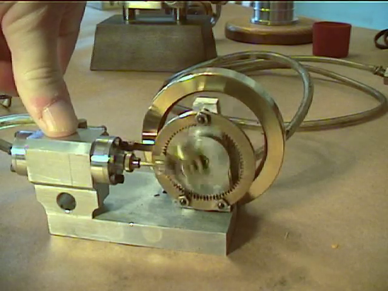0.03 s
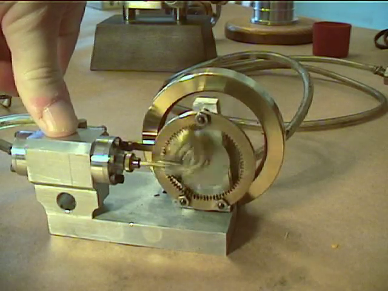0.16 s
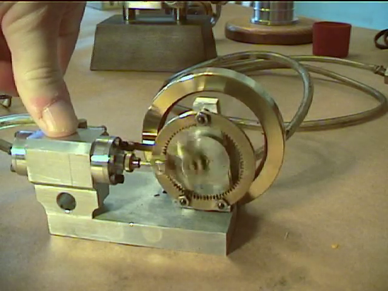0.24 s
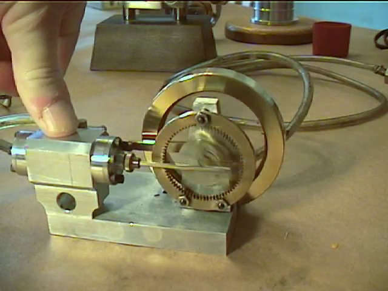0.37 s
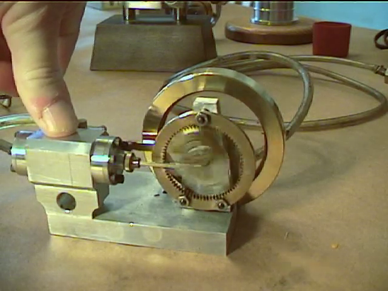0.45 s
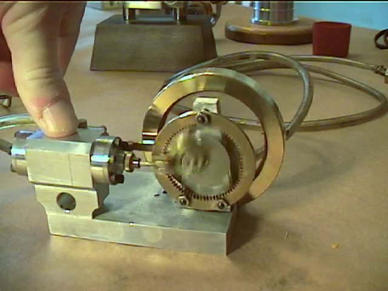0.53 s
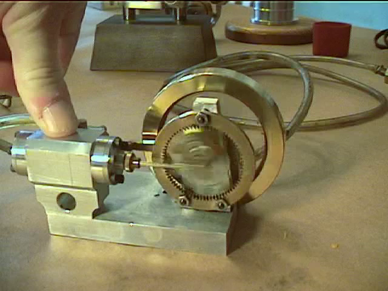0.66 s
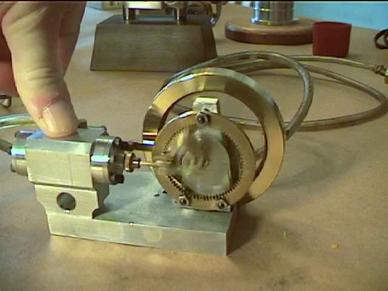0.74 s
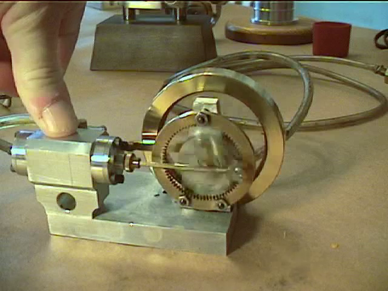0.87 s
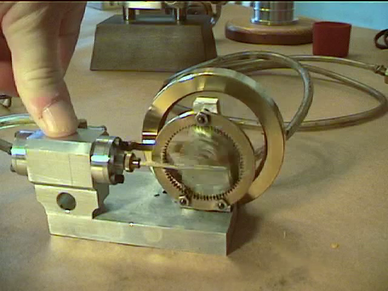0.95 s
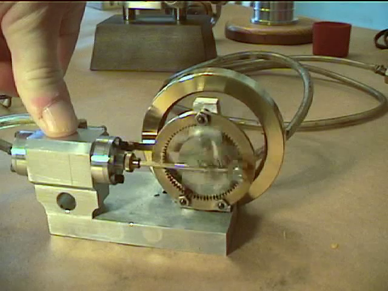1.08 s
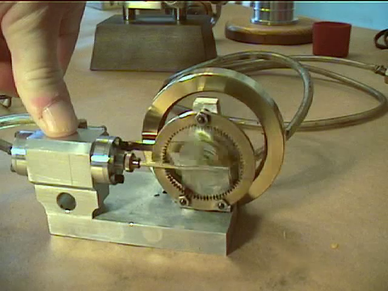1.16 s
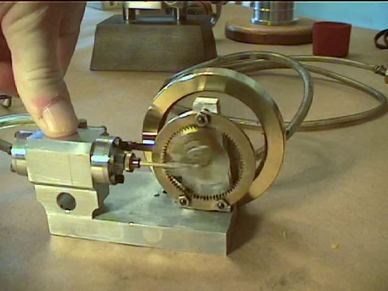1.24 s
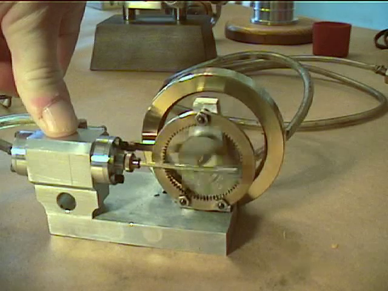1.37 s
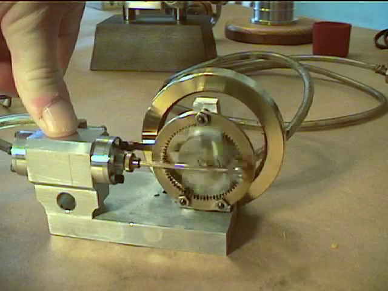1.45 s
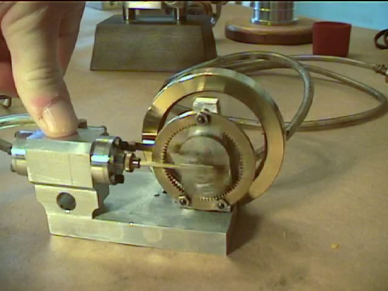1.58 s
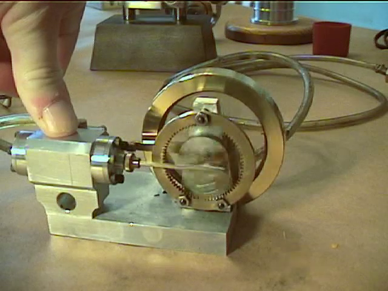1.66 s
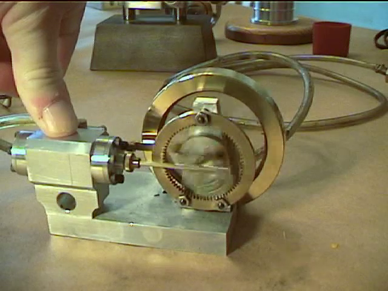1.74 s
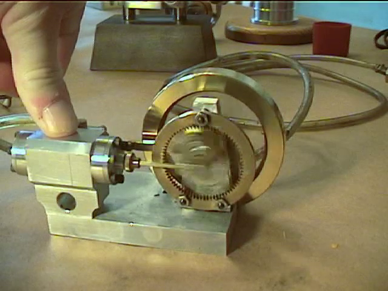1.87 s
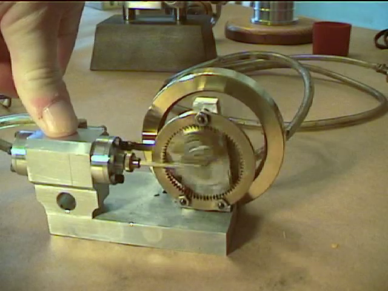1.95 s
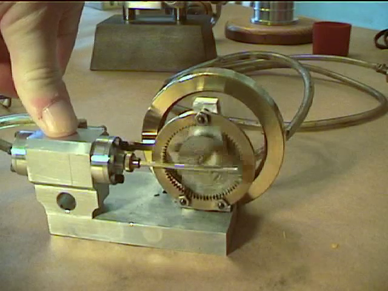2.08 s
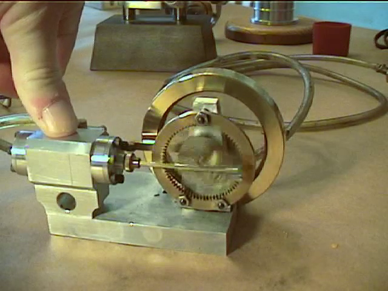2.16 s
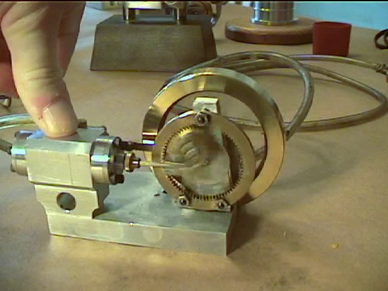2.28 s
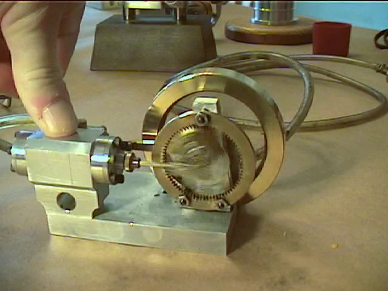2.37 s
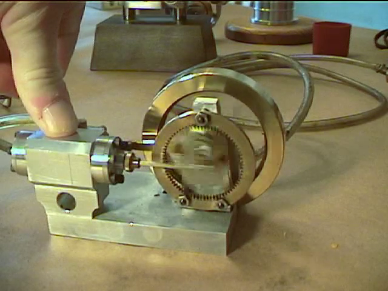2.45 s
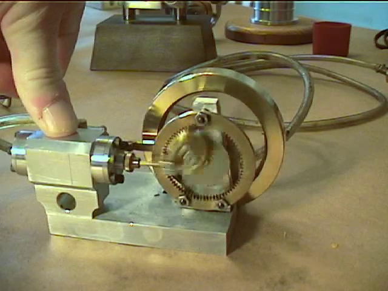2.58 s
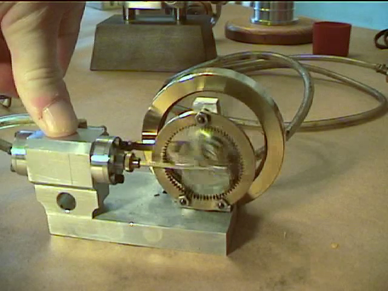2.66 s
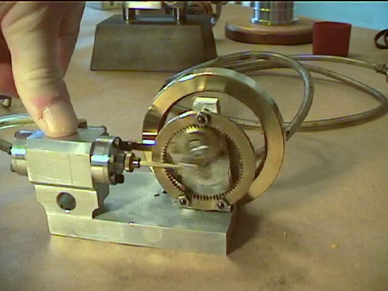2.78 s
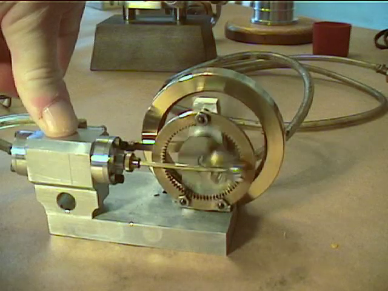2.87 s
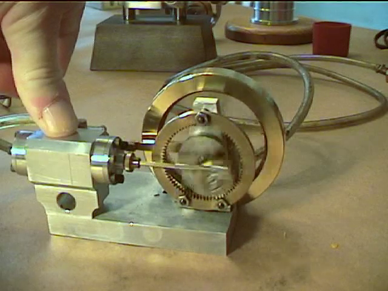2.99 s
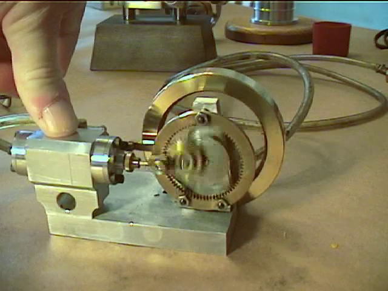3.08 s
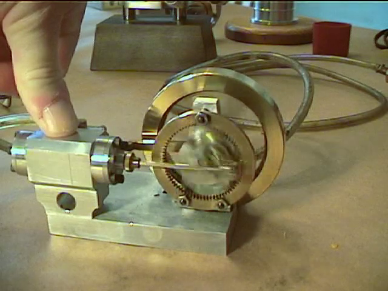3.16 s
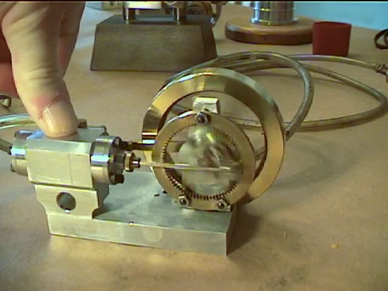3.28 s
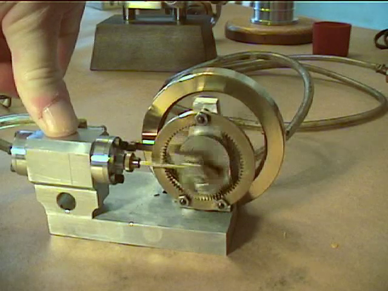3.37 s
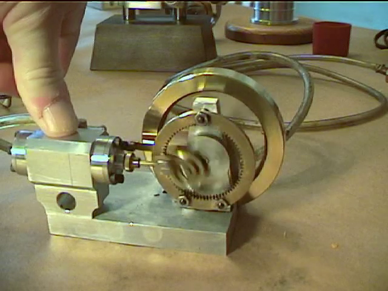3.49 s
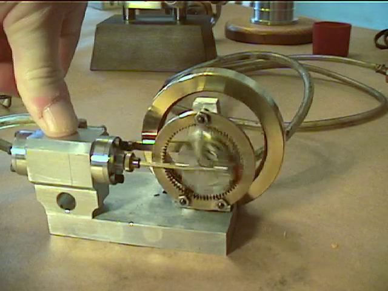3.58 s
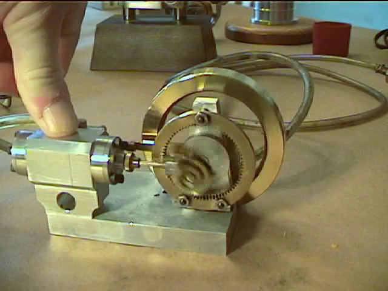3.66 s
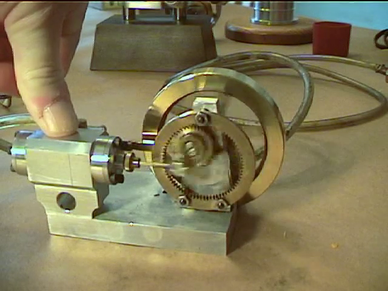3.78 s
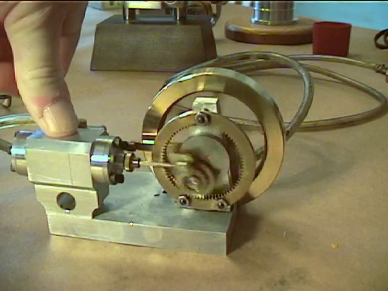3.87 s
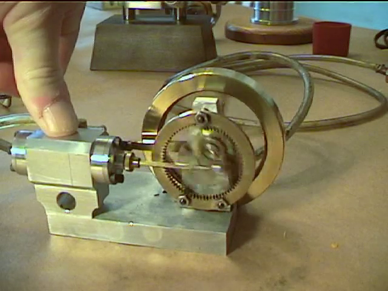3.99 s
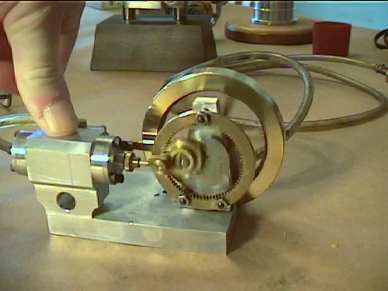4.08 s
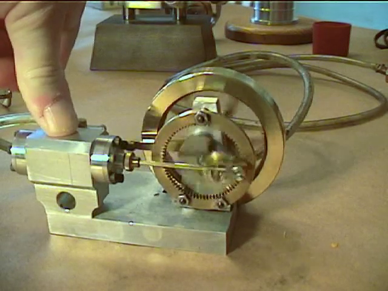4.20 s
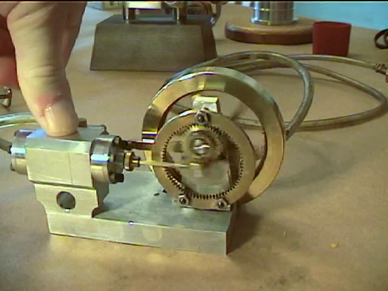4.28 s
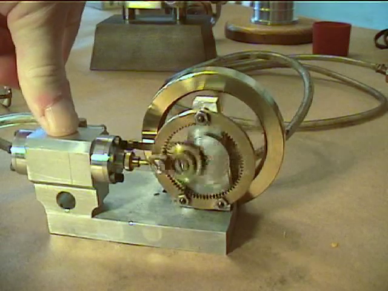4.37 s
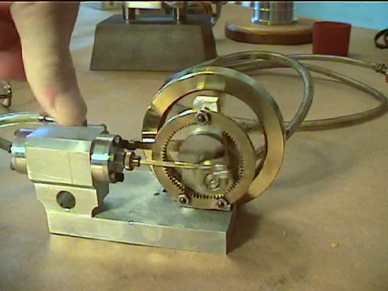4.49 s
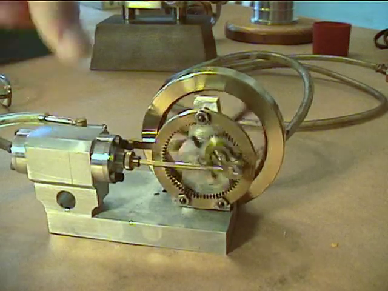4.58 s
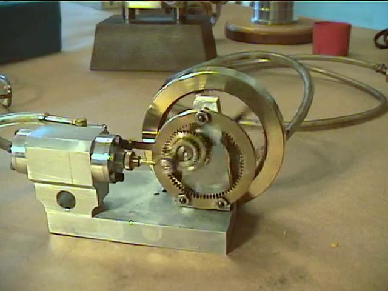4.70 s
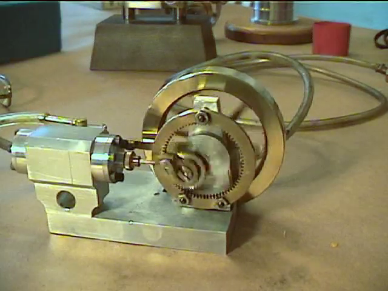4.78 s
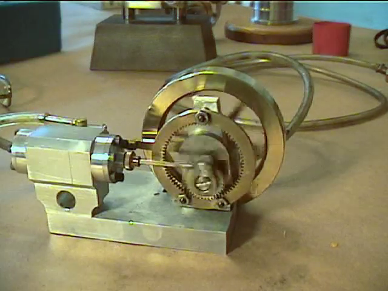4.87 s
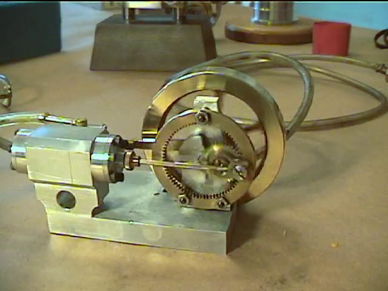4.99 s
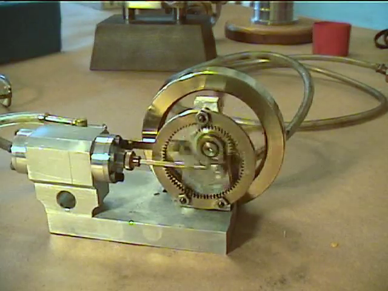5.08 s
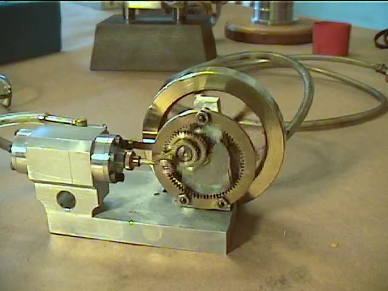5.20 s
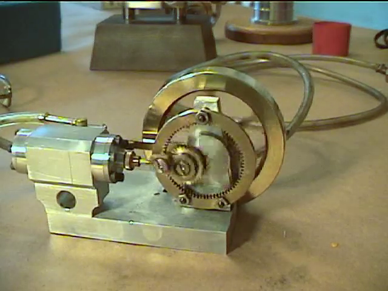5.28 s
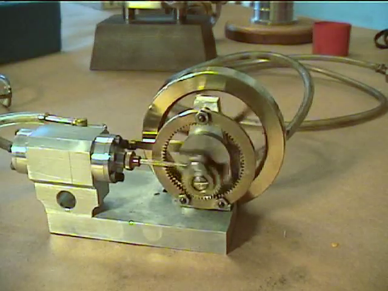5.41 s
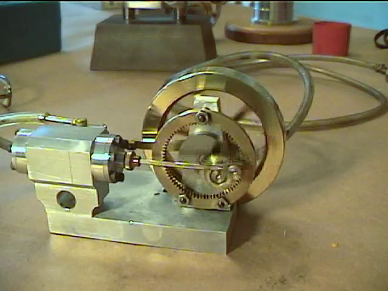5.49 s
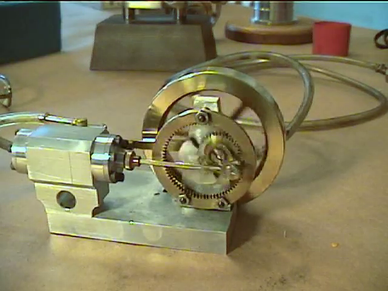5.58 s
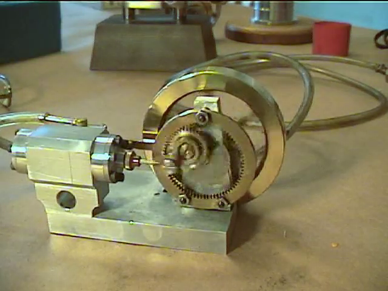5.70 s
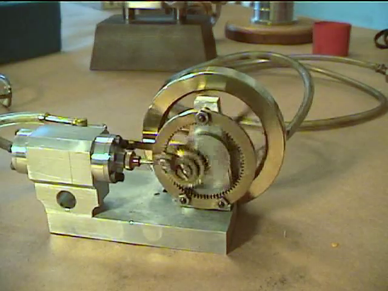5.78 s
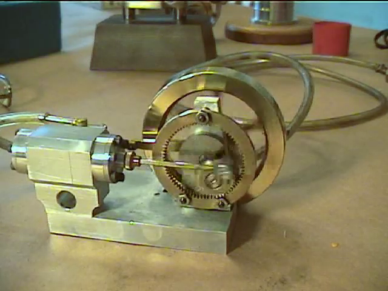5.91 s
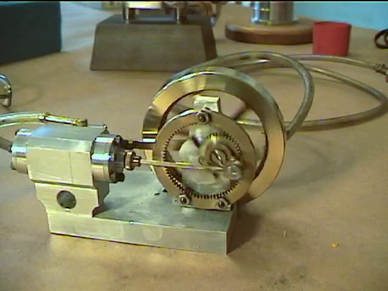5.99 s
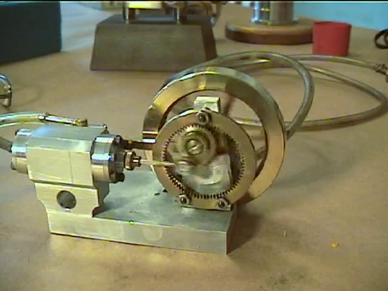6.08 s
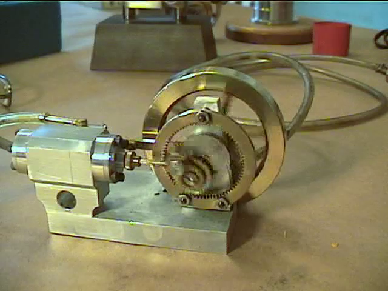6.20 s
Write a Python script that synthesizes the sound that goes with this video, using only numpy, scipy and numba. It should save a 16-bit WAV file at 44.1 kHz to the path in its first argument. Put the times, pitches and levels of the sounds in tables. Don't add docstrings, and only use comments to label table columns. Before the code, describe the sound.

From 0 to about 1.5 s a small engine runs fast and steadily close to the microphone: harsh, sputtering air hiss pulses nearly 28 times a second, blurred into a flutter, with a gear whine near 1 kHz, quick metallic ticks and a few dull low jolts. From 1.6 s it gradually slows; around 2.5-2.9 s speed and hiss drop sharply, the whine sinks and fades, and separate chuffs, loose gear rattle and ticks stand out. By 3.8 s the hiss is much weaker. A tiny dry snap with a bounce falls at 4.0 s. From 4.4 s only slow soft puffs and irregular bright clicks remain, nearly vanishing at 5.1 s, while a throbbing low compressor hum, about 290 Hz, and room noise come forward. A very faint thin whistle lasts from 4.9 to 5.6 s. Light hiss returns slightly from 5.7 s to the end, with slow ticks.

```python
import sys
import numpy as np
from scipy import signal
from scipy.fft import rfft, irfft
from scipy.io import wavfile
from scipy.ndimage import uniform_filter1d
from numba import njit

SR = 44100
rng = np.random.default_rng(int(sys.argv[2]) if len(sys.argv) > 2 else 0)


def digitize_waveform(pressure):
    field = np.atleast_2d(pressure).T
    bounded = np.clip(field, -1, 1)
    quanta = np.round(bounded * 32767).astype(np.int16)
    wavfile.write(sys.argv[1], SR, quanta)


def attenuation_scalar(level_db):
    decades = np.asarray(level_db, float) / 20
    return 10 ** decades


N = 275392
T = np.arange(N) / SR

# t/s, speed/(turns/s)
CRANK_SPEED = [(0, 13.788), (.42, 13.808), (1.36, 13.694), (1.69, 13.042), (1.87, 12.251), (2.27, 12.119),
               (2.47, 11.289), (2.82, 8.328), (2.92, 7.867), (3.36, 7.412), (3.44, 7.748), (3.73, 6.11),
               (3.81, 5.39), (4.25, 3.477), (4.44, 2.976), (5.07, 2.186), (6.3, 2.004)]
START_TURNS = -.5702
# t/s, level/dB
SUPPLY = [(0, -34), (.9, -34), (1.4, -34), (1.7, -36), (2.4, -35.5), (2.6, -39), (2.92, -41), (3.2, -40),
          (3.36, -39.5), (3.6, -41), (3.9, -48.5), (4.4, -51.5), (4.6, -56), (4.85, -58), (5.1, -67),
          (5.7, -55.5), (5.95, -55.5), (6.24, -53)]
# speed/(turns/s), thin leak/dB, rattle/dB, whine/dB, thump/dB
SPEED_LAW = [(2.2, -1, -32, -90, -29), (3, -7, -21, -90, -29), (3.8, -3.5, -9, -80, -25),
             (5.5, -7.5, -8.5, -54, -34), (7.7, -6.3, -11, -18.5, -32), (10.5, -5.5, -10.5, -12, -41),
             (12.2, -3.5, -9, -11, -38), (13.1, -3, -11, -3.5, -36), (13.75, -3, -11.5, -6.5, -42)]

# phase/turns, width/turns, level/dB against the open valve
VALVE_EVENTS = [
    (.31, 0.029, -6),
    (.4, 0.049, -4),
    (.76, 0.063, -2.5),
    (.86, 0.073, -3),
    (.99, 0.044, 1.5),
]
VALVE_OPEN_DB, VALVE_LEAD_TURNS = 1.0, 0.027
# f/Hz, width/Hz, level/dB
PORT_MODES = [(2400, 610, -4), (2960, 240, -4.5), (3870, 290, -0.5), (4220, 910, 3), (5020, 390, -1),
              (5360, 620, -4.5)]
# f/Hz, level/(dB per Hz)
JET_SPECTRUM = [(710, 0), (1200, -9.5), (1540, -2.5), (3550, -2.5), (3890, -7), (5120, -3.5), (6030, -4.5),
                (9770, -9.5), (10600, -15.5), (13800, -69), (22000, -120)]

# phase/turns, rattle/dB, whine/dB
GEAR_CONTACT = [(0, -3, 5.5), (.06, 5.5, 1.5), (.14, 4, -5.5), (.22, -2, -16), (.38, -11, -19),
                (.5, -6, -8.5), (.72, -3, -13), (.82, 5, -6), (.93, 2, 3.5)]
TEETH = 72
WEAR_ORDERS, WEAR_DEPTH = (29, 31), .45
# f/Hz, width/Hz, level/dB
BASE_MODES = [(560, 150, -7), (814, 82, -4.5), (941.5, 41, -1), (1140, 67, 2), (1391, 51, -1),
              (1636, 33, -8.5), (2500, 230, -31)]
# f/Hz, width/Hz, level/dB
BENCH_MODES = [(182, 187, 6), (355, 20, 2.5), (432, 9.4, -4), (493.4, 20, -0.5), (610, 85, 4.5)]

# phase/turns, thump/dB, knock/dB
ROD_REVERSALS = [
    (0.226, 0, -65),
    (0.439, -5, -64),
    (0.619, -14, -72),
    (0.858, -7, -97),
]

PUMP_HZ, PUMP_START_S, HUM_ORDER = 14.129, .0275, 20.5
HUM_DB, BLOWN_DB, PUMP_DB = -55.5, -62, -70.5
# phase/strokes, level/dB
PUMP_STROKE = [(0, -16), (.08, -9), (.17, -4), (.28, -3), (.38, -.5), (.52, -5), (.66, 0), (.8, -2.5),
               (.9, -9)]
# f/Hz, width/Hz, level/dB
CASING_MODES = [(163, 28, -9.5), (420, 17, -29), (533, 18, -14), (605.4, 9.5, -11.5), (836, 21, -6.5),
                (997, 7.9, -10.5)]
# f/Hz, width/Hz, level/dB
GRILLE_MODES = [(2710, 70, -18), (6600, 380, 3), (8100, 240, 10.5), (8840, 200, -6)]
WHISTLE_FROM_S, WHISTLE_TO_S, WHISTLE_EDGE_S, WHISTLE_DB = 4.86, 5.62, .04, -71
# f/Hz, level/(dB per Hz)
ROOM_SPECTRUM = [(20, -21), (110, -12.5), (200, -5.5), (290, 5), (400, -3.5), (600, 0.5), (720, -9),
                 (1010, -3), (1150, -10.5), (1500, -11), (2300, -10.5), (2630, -5), (3300, -7), (6700, -4),
                 (7300, -10), (10800, -19)]
ROOM_DB = -52

# t/s, peak level/dB
BASE_JOLTS = [(0.048, -72), (0.327, -61), (0.397, -57), (0.475, -61), (0.645, -66), (0.689, -57),
              (0.847, -61), (1.054, -67), (1.42, -57), (1.492, -64), (1.801, -66), (1.889, -64),
              (1.963, -60), (2.049, -64), (2.209, -61), (2.293, -64), (2.456, -64), (2.907, -63),
              (3.014, -62), (3.137, -72), (3.329, -68), (3.379, -70), (3.973, -63), (4.199, -71),
              (4.865, -63)]
JOLT_HZ, JOLT_WIDTH_HZ, JOLT_DB, JOLT_LAG_S = 36., 110., 1, .014

# phase/turns, lead when slack/turns, peak over hiss/dB, rise when slack/dB, f/Hz
DEAD_CENTRES = [
    (.468, .035, 15, 1.5, 4370),
    (.96, .17, 10, 8.5, 4780),
]
ODD_TURN_DB, TICK_SCATTER_DB, RING_SCATTER = -2.5, 1.5, 0.09
PLAY_FROM_S, PLAY_TO_S = .05, 3.42
# t/s, peak level/dB, f/Hz
HARD_TICKS = [(.3636, -17, 5000), (.4368, -19, 4350), (1.1628, -15, 4340), (1.2703, -18, 3870),
              (1.6811, -14, 4000), (2.0039, -18, 4300), (2.0837, -18, 4870), (2.168, -18, 4430),
              (2.9088, -20.5, 5230), (3.3772, -27, 4200), (4.5844, -32, 4860), (4.9215, -35, 5900)]
# t/s, high peak level/dB, high f/Hz, low peak level/dB, low f/Hz
SLOW_TICKS = [(3.461, -24.5, 3940, -47, 3180), (3.5114, -29, 5090, -44, 2780),
              (3.7785, -32, 3790, -45, 2940), (3.8427, -38, 3890, -47, 3490), (3.958, -34, 4100, -51, 3490),
              (3.998, -33, 4100, -41, 1940), (4.21, -36, 7650, -43.5, 2400),
              (4.2768, -42, 3800, -42.5, 2790), (4.3388, -36.5, 3710, -57, 2870),
              (4.4115, -39, 5360, -44, 2960), (4.506, -36, 4200, -46, 3180),
              (4.5244, -37.5, 5410, -55, 3100), (4.5685, -38, 3910, -51, 3050),
              (4.7585, -39, 5470, -47, 2690), (4.8894, -37, 4240, -42, 3220), (4.982, -35, 4870, -47, 3420),
              (5.1267, -50, 3810, -44, 2970), (5.31, -34, 5230, -45, 2800), (5.4073, -35, 4170, -46, 3120),
              (5.67, -45, 5660, -41, 2840), (5.8194, -40, 5760, -44, 2670), (5.8953, -34, 4190, -46, 2360),
              (5.995, -40, 5400, -48, 1630), (6.0885, -38, 4020, -48, 2570)]
# f/Hz, width/Hz, level/dB
JOINT_MODES = [(1430, 570, 12), (2290, 270, -3.5), (2750, 180, -6.5), (3130, 84, -2.5), (4100, 430, 6.5),
               (4530, 210, 0.5), (4970, 300, 6), (5640, 1900, 5.5), (6620, 400, 4.5), (7650, 500, 7.5)]
# t/s, peak level/dB
JOINT_SNAPS = [
    (3.9984, -22),
    (4.0085, -32),
]
SNAP_LENGTH_S = .00004

KNEE_DB, DUCKING, FULL_GAIN_DB = -38, 1.4, 0.9
RECOVER_FROM_S, RECOVER_DB_PER_S = 5.03, 1.2
TOP_HZ = 10750


def level(x, db):
    return x * attenuation_scalar(db) / np.sqrt(np.mean(x ** 2))


@njit
def svf(x, hz, width):
    y, band, low = np.empty(len(x)), 0., 0.
    g, k = np.tan(np.pi * hz / SR), width / hz
    for i in range(len(x)):
        v = (band + g * (x[i] - low)) / (1 + g * (g + k))
        band = 2 * v - band
        low = low + 2 * g * v
        y[i] = k * v
    return y


def ring(x, modes):
    out = 0
    for k, (hz, width, db) in enumerate(modes):
        out = out + (-1) ** k * attenuation_scalar(db) / width * svf(x + 1e-18, 1. * hz, 1. * width)
    return out


def coloured(spectrum):
    hz, db = np.transpose(spectrum)
    bins = np.maximum(np.arange(N // 2 + 1) * SR / N, 1)
    weight = attenuation_scalar(np.interp(np.log(bins), np.log(hz), db))
    return level(irfft(rfft(rng.standard_normal(N)) * weight, N), 0)


def walk(rate):
    k = int(SR / rate)
    held = np.repeat(rng.standard_normal(N // k + 1), k)
    return 1.35 * uniform_filter1d(uniform_filter1d(held, k), k)[:N]


def clicks(phase):
    step = np.floor(phase).astype(int)
    at = np.flatnonzero(np.diff(step)) + 1
    late = (phase[at] - step[at]) / (phase[at] - phase[at - 1])
    out = np.zeros(N)
    out[at - 1], out[at] = late, 1 - late
    return out, np.append(step[1:], step[-1])


def air(turns, slack, hiss_db, leak_db):
    valve_db = VALVE_OPEN_DB
    for phase, width, db in VALVE_EVENTS:
        away = (turns + VALVE_LEAD_TURNS * slack ** 2 - phase + .5) % 1 - .5
        valve_db = valve_db + db * np.exp(-(away / width) ** 2)
    valve_db = valve_db * (1 + .55 * slack)
    sputter = attenuation_scalar(1.2 * walk(900) + 0.32 * walk(120))
    drops = (rng.random(N) < 250 / SR) * attenuation_scalar(np.minimum(3.2 * rng.exponential(size=N), 14))
    jet = coloured(JET_SPECTRUM) * sputter + level(svf(drops, 6800.0, 5000.), -15)
    port = 0
    for hz, width, db in PORT_MODES:
        mode = svf(rng.standard_normal(N) * sputter, 1. * hz, 1. * width)
        port = port + level(mode * attenuation_scalar(1.3 * walk(60)), db)
    leak_cut = signal.butter(3, 6200, "high", fs=SR, output="sos")
    thin = signal.sosfilt(leak_cut, coloured(JET_SPECTRUM) * attenuation_scalar(1.35 * walk(300)))
    roar_cut = signal.butter(2, 1500, "high", fs=SR, output="sos")
    roar = signal.sosfilt(roar_cut, svf(jet, 3400.0, 8600.0))
    pressure = attenuation_scalar(0.99 * np.clip(hiss_db + 32.0, -8, 0))
    exhaust = level(port, -2.38) + level(roar, -3.0) * pressure
    return attenuation_scalar(hiss_db) * (attenuation_scalar(valve_db) * exhaust + attenuation_scalar(leak_db + .5 * valve_db) * level(thin, -0.89))


def gear(turns, slack, rattle_db, whine_db):
    phase, *columns = np.transpose(GEAR_CONTACT)
    slack_db, bearing_db = (np.interp(turns, phase, c, period=1) for c in columns)
    mesh = TEETH * (turns + 0.001 * np.sin(2 * np.pi * turns))
    whine = np.sin(2 * np.pi * mesh + 0.34 * walk(150)) * attenuation_scalar(bearing_db + whine_db + .8 * walk(30))
    pulses, tooth = clicks(mesh)
    waves = sum(np.cos(2 * np.pi * order * tooth / TEETH) for order in WEAR_ORDERS)
    worn = pulses * (rng.standard_normal(TEETH)[tooth % TEETH] + WEAR_DEPTH * waves)
    chatter = rng.standard_normal(N) * attenuation_scalar(slack_db + 2.5 * walk(160))
    rattle = level(ring(chatter, BASE_MODES), 0.71) + level(ring(worn * attenuation_scalar(slack_db), BASE_MODES), -5.0)
    rubbing = rng.standard_normal(N) * attenuation_scalar(0.32 * slack_db)
    rush = level(svf(rubbing, 1170.0, 520.0), -0.28) + level(ring(worn, BENCH_MODES), -14.5)
    drop = np.exp(-((turns % 1 - .48) / 0.049) ** 2) * slack ** 3 * rng.standard_normal(N)
    rattle = rattle + level(svf(svf(drop, 616.0, 100.0), 540.0, 170.0), -15.5)
    return whine + attenuation_scalar(rattle_db) * (slack * rattle + (1.15 - slack) * rush)


def rod(turns, rattle_db, thump_db):
    out = 0
    for phase, low_db, knock_db in ROD_REVERSALS:
        pulses, step = clicks(turns - phase)
        pulses = pulses * attenuation_scalar(3.1 * np.clip(rng.standard_normal(60), -2, 1)[step])
        thump = svf(svf(pulses, 38.0, 100.0), 38.0, 100.0)
        knock = ring(pulses * attenuation_scalar(rattle_db), BENCH_MODES)
        out = out + level(thump, low_db - 5.5) * attenuation_scalar(thump_db) + level(knock, knock_db)
    return out


def compressor():
    stroke = PUMP_HZ * (T - PUMP_START_S) + 1
    swing = (-1) ** np.floor(stroke) * attenuation_scalar(np.interp(stroke, *np.transpose(PUMP_STROKE), period=1))
    hum = uniform_filter1d(swing, size=200) * np.sin(2 * np.pi * HUM_ORDER * stroke)
    casing = ring(clicks(stroke)[0], CASING_MODES)
    blown = ring(rng.standard_normal(N), CASING_MODES + GRILLE_MODES)
    steady = level(hum, HUM_DB) + level(casing, PUMP_DB) + level(blown, BLOWN_DB)
    return (steady + whistle()) * attenuation_scalar(0.65 * walk(6.33))


def room_noise():
    return level(coloured(ROOM_SPECTRUM) * attenuation_scalar(1.06 * walk(25.26)), ROOM_DB)


def jolts():
    s, db = np.transpose(BASE_JOLTS)
    blows, one = np.zeros(N), np.zeros(N)
    blows[((s + JOLT_LAG_S) * SR).astype(int)] = attenuation_scalar(db + JOLT_DB)
    one[0] = 1
    thuds, single = (svf(svf(b + 1e-18, JOLT_HZ, JOLT_WIDTH_HZ), JOLT_HZ, JOLT_WIDTH_HZ)
                     for b in (blows, one))
    return thuds / np.max(np.abs(single))


def play(turns, slack, hiss_db):
    rows, n = [], np.arange(50)
    for phase, early, over_db, slack_db, hz in DEAD_CENTRES:
        s = np.interp(n + phase, turns + early * slack ** 2, T)
        at = (s * SR).astype(int)
        chance = np.clip(rng.standard_normal((len(n), 2)), -2, 2).T
        db = hiss_db[at] + over_db + slack_db * slack[at]
        db = db + ODD_TURN_DB * (n % 2) + TICK_SCATTER_DB * chance[0]
        blows = zip(s, db, hz * (1 + RING_SCATTER * chance[1]))
        rows += [row for row in blows if PLAY_FROM_S < row[0] < PLAY_TO_S]
    return rows


def ticks(table, cut_db, focus_db, tail_s):
    out, t = np.zeros(N + 900), np.arange(900) / SR
    for (s, db, pitch), grain in zip(table, rng.standard_normal((len(table), 900))):
        blow = (t == 0) + 0.13 * grain * np.exp(-t / tail_s)
        near = [(hz, width, mode_db + 20 * np.log10(width) / 2 - focus_db * abs(np.log2(hz / pitch)))
                for hz, width, mode_db in JOINT_MODES]
        tick = ring(blow, near)
        at = int(s * SR)
        out[at:at + 900] += attenuation_scalar(db + cut_db) * tick / np.max(np.abs(tick))
    return out[:N]


def snaps():
    return sum(attenuation_scalar(db) * np.exp(-((T - s) / SNAP_LENGTH_S) ** 2) for s, db in JOINT_SNAPS)


def whistle():
    start = np.tanh((T - WHISTLE_FROM_S) / WHISTLE_EDGE_S)
    stop = np.tanh((T - WHISTLE_TO_S) / WHISTLE_EDGE_S)
    return level(svf(rng.standard_normal(N), 1728., 10.0), WHISTLE_DB) * (start - stop) / 2


def recorder_gain_db(hiss_db):
    gain_db = FULL_GAIN_DB - DUCKING * 10 * np.log10(1 + attenuation_scalar(hiss_db - KNEE_DB) ** 2)
    return gain_db + RECOVER_DB_PER_S * np.maximum(T - RECOVER_FROM_S, 0)


def scene():
    speed = np.interp(T, *np.transpose(CRANK_SPEED))
    turns = START_TURNS + np.cumsum(speed) / SR
    hiss_db = np.interp(T, *np.transpose(SUPPLY))
    law, *columns = np.transpose(SPEED_LAW)
    leak_db, rattle_db, whine_db, thump_db = (np.interp(speed, law, c) for c in columns)
    rattle_db, whine_db, thump_db = rattle_db + hiss_db, whine_db + hiss_db, thump_db + hiss_db
    slack = np.clip((13.7 - speed) / 3.6, .15, 1)
    engine = air(turns, slack, hiss_db, leak_db)
    engine = engine + gear(turns, slack, rattle_db, whine_db)
    engine = engine + rod(turns, rattle_db, thump_db)
    background = compressor() + room_noise()
    engine = engine + jolts()
    engine = engine + ticks(play(turns, slack, hiss_db) + HARD_TICKS, -7.5, 19.7, 0.0037)
    high = [row[:3] for row in SLOW_TICKS]
    low = [(row[0], row[3], row[4]) for row in SLOW_TICKS]
    engine = engine + ticks(high, 0.47, 15.4, 0.0019) + ticks(low, 2.9, 30.5, 0.0042)
    engine = engine + snaps()
    return np.tile(engine + background * attenuation_scalar(recorder_gain_db(hiss_db)), (2, 1))


def band_limit(x):
    return signal.sosfilt(signal.butter(12, 10760, fs=SR, output="sos"), x)


def record(dry):
    low = signal.sosfilt(signal.ellip(10, .3, 80, TOP_HZ, fs=SR, output="sos"), dry)
    return band_limit(low)


dry = scene()
out = record(dry)
digitize_waveform(out)
```